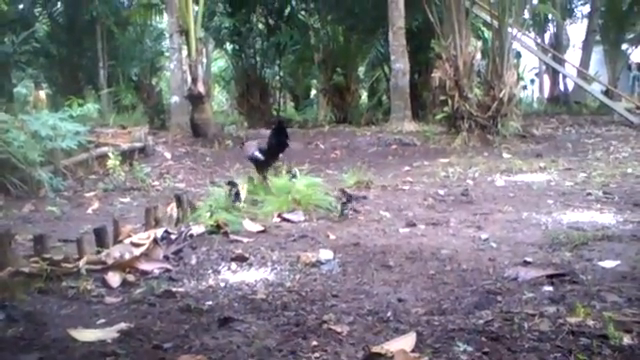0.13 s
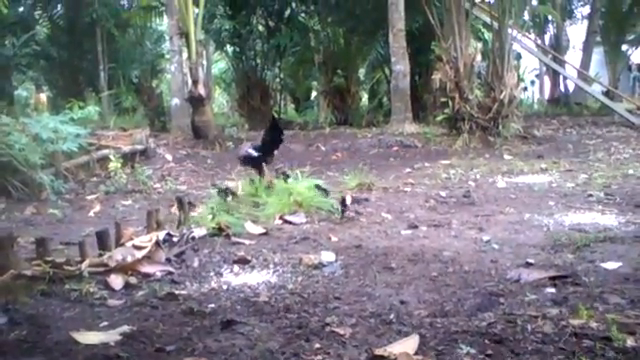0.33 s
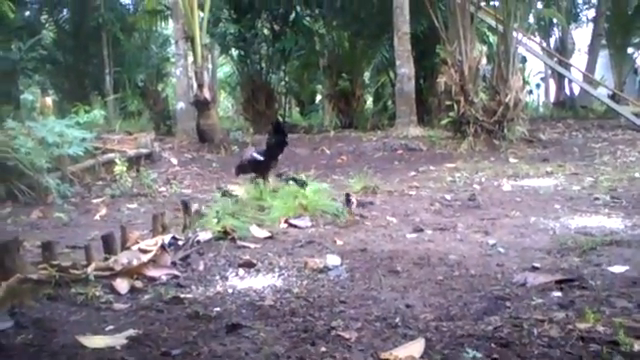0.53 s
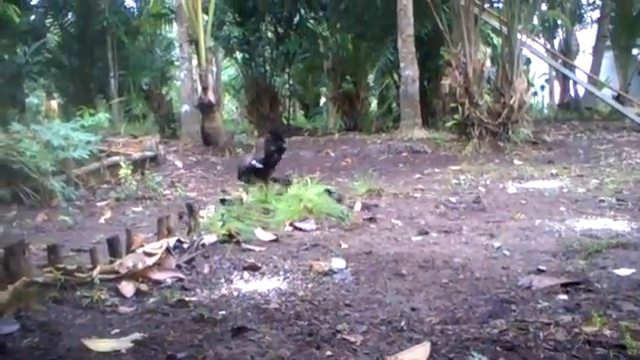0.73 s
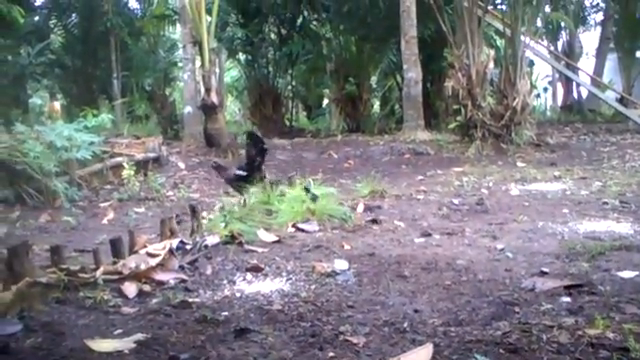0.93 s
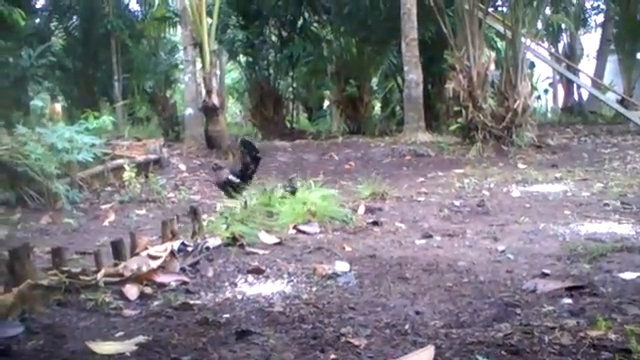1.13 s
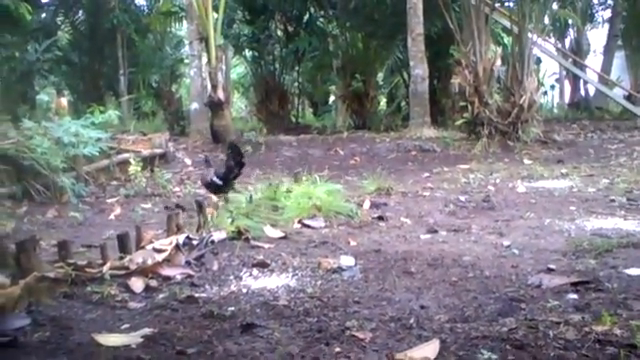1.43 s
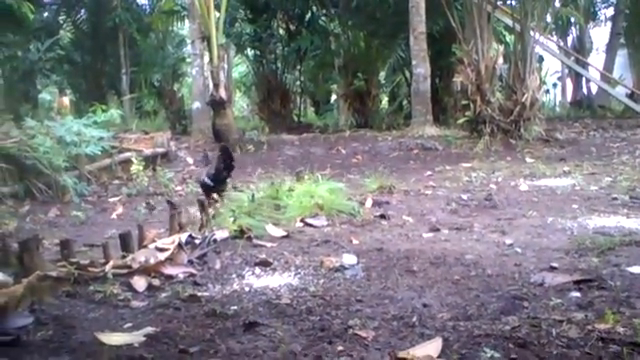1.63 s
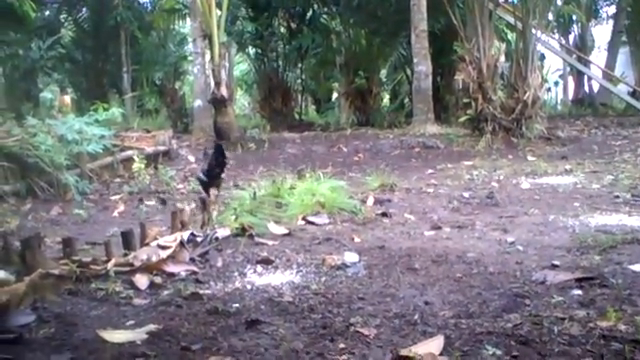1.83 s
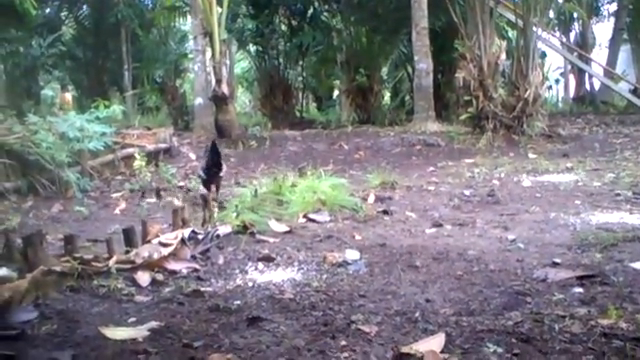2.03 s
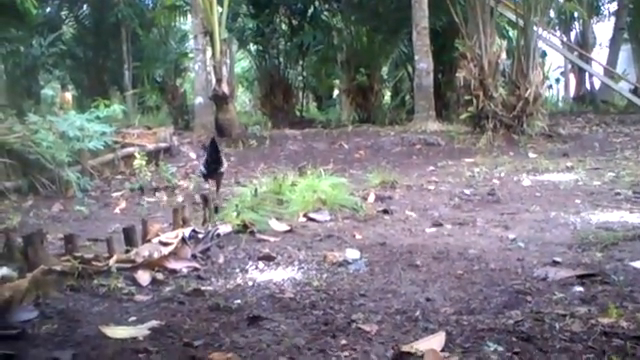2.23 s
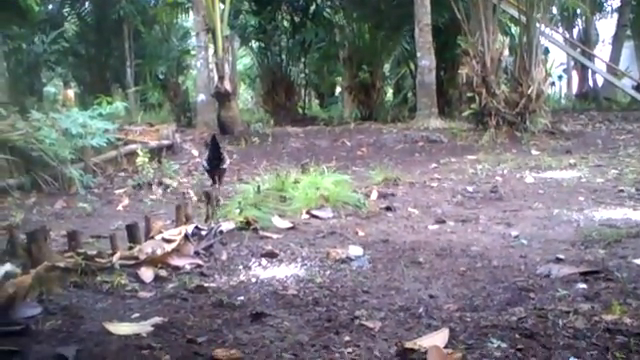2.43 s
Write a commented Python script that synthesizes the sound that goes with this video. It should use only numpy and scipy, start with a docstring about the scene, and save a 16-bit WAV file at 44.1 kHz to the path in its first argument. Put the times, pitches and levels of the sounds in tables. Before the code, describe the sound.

Chicks peep throughout with thin, quick falling whistles, some blurred by distance, and rapid trills around 0.1, 0.3, 0.6, 1.0, 1.4, 1.6, 1.85, 2.1 and 2.3 seconds. A hen gives soft hoarse clucks about four times a second. High insects throb and hiss steadily. A far engine thuds low, slowing slightly from fourteen to twelve beats a second. Dry litter swishes briefly at 2.27, then peeps cluster at 2.5.

```python
"""Chicks, hen and engine in a yard.

Chicks peep and trill (gliding sines) around a softly clucking hen (pulses and rasp through resonances);
trees scatter every call (decaying-noise convolution). Litter scuffs once (a noise burst).
Insects throb in the bushes (narrow noise bands) under a far chorus and outdoor air (shaped noise).
Far off a slow one-cylinder engine thuds twelve to fourteen times a second
(rounded low tone bursts, each with an echo, and puffs)."""
import sys
import numpy as np
from scipy import signal
from scipy.fft import rfft, irfft
from scipy.io import wavfile

SR = 44100
rng = np.random.default_rng(int(sys.argv[2]) if len(sys.argv) > 2 else 0)


def to_wav(sig):
    """Store sig (one row per channel, or 1-D mono) as 16-bit WAV at the path in sys.argv[1].

    Samples outside -1..1 are clipped; the rate is SR.
    """
    pcm = np.clip(np.atleast_2d(sig), -1, 1) * 32767
    pcm = np.round(pcm).astype(np.int16)
    wavfile.write(sys.argv[1], SR, pcm.T)  # frames by channels


N = 114660
T = np.arange(N) / SR  # s

# insect bands: pitch_hz, width_hz, level_db
THROBBER_BAND = (8764, 540, -60)
# insect band, level before the swell: pitch_hz, width_hz, level_db
DRONER_BAND = (7170, 130, -78)
# slow level curve of the droner: time_s, gain_db
DRONER_SWELL = [(0, -21), (.55, -1), (.98, 8), (1.15, 5), (1.35, -3), (1.8, -1), (2.3, 6), (2.6, 7)]
# far insect chorus spectrum: freq_hz, relative_density_db
CHORUS_SPECTRUM = [(2000, -66), (2800, -4.5), (3400, 5.5), (4200, 4), (4800, 8.5), (5300, -6), (6200, -19)]
# outdoor air spectrum: freq_hz, relative_density_db
AIR_SPECTRUM = [(20, -9), (50, 2), (130, 1), (220, -14), (330, -15), (600, -17.5), (1200, -25.5),
                (2400, -25.5), (4000, -30), (6200, -35), (10000, -37), (17000, -36.5)]
# time between engine firings: time_s, period_s
FIRING_PERIODS = [(0, .072), (.24, .075), (.4, .0795), (1.2, .081), (1.6, .085)]
# engine load: time_s, relative_level_db
ENGINE_LOAD = [(0, 0), (.09, -5), (.16, -3.5), (.24, -0.5), (.39, -3), (.47, -6), (.55, -8), (.63, -0.5),
               (.79, 1.5), (.87, -2), (.95, -1), (1.27, 0), (1.35, -6.5), (1.43, 0.5), (1.52, -4.5),
               (1.6, -1), (2.6, -1.5)]
# exhaust gas spectrum: freq_hz, relative_density_db
PUFF_SPECTRUM = [(120, 8), (170, 6), (300, 3.5), (500, -1), (750, -10.5), (1200, -35)]
# hen's clucks: middle_s, length_s, throat_hz, level_db
HEN_CLUCKS = [(.012, 0.073, 667, -41), (0.222, 0.079, 640, -42), (0.462, .06, 850, -44),
              (0.734, 0.057, 640, -42), (0.941, 0.067, 630, -42), (1.17, 0.15, 600, -47.5),
              (1.41, 0.08, 723, -46), (1.637, 0.067, 650, -47.5), (1.874, 0.065, 616, -42),
              (2.099, 0.12, 665, -44.5), (2.409, 0.07, 600, -41.5)]
# distant peeps, heard only as scatter: start_s, length_s, first_hz, last_hz, relative_level_db
DISTANT_PEEPS = [(-0.02, 0.041, 4774, 3490, -38), (0.095, 0.053, 4350, 3480, -43),
                 (0.198, 0.05, 4200, 3560, -52), (0.239, 0.051, 4780, 3190, -46),
                 (0.323, 0.024, 4000, 3380, -49), (0.41, 0.075, 4470, 3425, -47.5),
                 (0.473, 0.053, 5410, 4250, -42.5), (0.55, 0.15, 5770, 4810, -54),
                 (0.589, 0.051, 3950, 3180, -42), (0.655, 0.055, 5760, 4900, -47.5),
                 (0.8, 0.066, 4877, 3265, -44), (0.955, 0.062, 4900, 4180, -44),
                 (1.020, .045, 3400, 2800, -55), (1.160, 0.074, 4310, 3060, -51),
                 (1.254, 0.052, 4900, 3655, -49), (1.559, 0.0413, 3780, 3070, -43.5),
                 (1.652, 0.057, 4650, 3020, -50), (1.890, .05, 4470, 3365, -40),
                 (2.008, 0.058, 4490, 3400, -41.5), (2.150, 0.035, 4530, 4150, -38),
                 (2.179, 0.0325, 3850, 3310, -37), (2.299, .05, 4180, 3020, -38.5),
                 (2.385, 0.055, 5050, 4510, -48), (2.465, 0.088, 4370, 3290, -42)]
# near peeps: start_s, length_s, first_hz, last_hz, relative_level_db
NEAR_PEEPS = [(0.012, 0.061, 4200, 3380, -41), (0.232, 0.038, 5150, 5030, -56),
              (0.250, 0.038, 4300, 3280, -38.5), (0.442, 0.047, 5400, 5230, -50),
              (0.478, 0.028, 4400, 3550, -39), (0.488, 0.066, 5500, 4710, -53),
              (0.535, 0.053, 5400, 4770, -48), (0.540, 0.044, 3400, 2830, -53.5),
              (0.668, 0.033, 4700, 5410, -39), (0.696, 0.035, 4500, 4390, -37),
              (0.815, 0.028, 4400, 3675, -68), (0.845, 0.025, 3850, 3507, -43.5),
              (0.868, 0.038, 4600, 4150, -47), (0.985, 0.027, 3900, 3360, -47),
              (1.149, 0.025, 4053, 3493, -39), (1.205, 0.029, 3850, 3570, -48),
              (1.285, 0.03, 4300, 3610, -50), (1.412, 0.035, 2450, 2910, -55.5),
              (1.480, .048, 3600, 3140, -46), (1.552, 0.04, 4300, 3525, -43.5),
              (1.662, 0.045, 3900, 2350, -41.5), (1.720, 0.039, 3700, 3400, -51),
              (1.765, 0.048, 3680, 3340, -48), (1.906, 0.0223, 4260, 3530, -43.5),
              (1.940, 0.023, 3700, 3200, -43), (1.992, 0.028, 3800, 3370, -39),
              (2.015, 0.019, 3280, 2540, -38), (2.060, 0.038, 3700, 3430, -44),
              (2.098, 0.033, 4100, 3300, -41.5), (2.207, 0.02, 3464, 2540, -32),
              (2.465, .04, 4400, 3390, -44.5), (2.525, 0.033, 4000, 3500, -41),
              (2.547, .026, 4600, 3910, -37), (2.568, 0.018, 4000, 3320, -31.5)]
# short notes of the trills: start_s, middle_hz, relative_level_db
TRILLS = [(.074, 4490, -36.5), (.104, 4480, -35.5), (.128, 4160, -41), (.276, 4600, -40), (.314, 4536, -37),
          (.346, 4550, -37.5), (.587, 4430, -34.5), (.607, 4534, -31), (.634, 4410, -38),
          (1.005, 4650, -44), (1.325, 4410, -39.5), (1.361, 4680, -35), (1.394, 4706, -34),
          (1.429, 4700, -33), (1.568, 4700, -36.5), (1.605, 4690, -33.5), (1.641, 4680, -33),
          (1.805, 4660, -35.5), (1.844, 4706, -33), (1.880, 4710, -33.5), (2.043, 4630, -37.5),
          (2.078, 4720, -33.5), (2.113, 4770, -33), (2.283, 4750, -36), (2.317, 4800, -35),
          (2.352, 4710, -32)]
# dry litter spectrum: freq_hz, relative_density_db
SCUFF_SPECTRUM = [(800, -13), (1100, -12), (1500, -9), (1850, -6.5), (2100, -9), (2550, -6), (3100, -9),
                  (4500, -5.5), (5400, -22), (10000, -40), (16000, -46)]

THROB_PERIOD_S, THROB_PEAK_S, THROB_DEPTH = .1442, .102, .8
CHORUS_DB, AIR_DB = -52, -45.5
FIRST_FIRING_S, THUD_DB, THUD_SPREAD_DB = .0175, -25.5, 1.65
EXHAUST_HZ, EXHAUST_WIDTH_HZ = 89.3, 46
KNOCK_HZ, KNOCK_SHARE = 148, .24  # the exhaust's upper resonance
ECHO_S, ECHO_WANDER_S = .0172, .0013
PUFF_DB, PUFF_S, PUFF_LEAD_S = -41, .068, .022
CLUCK_HZ, CLUCK_JITTER_SHARE, CLUCK_RASP = 201.7, .1207, .47
THROAT_WIDTH_HZ = 212
CHEST_HZ, CHEST_WIDTH_HZ, CHEST_DB = 295, 140, -1
HEN_SCATTER_DB = -18
CHIRP_ATTACK_SHARE = .22
CHIRP_EDGE = .8  # lower values hold the level to the ends
QUAVER_SHARE, QUAVER_POINTS_PER_S, FLUTTER_DB = .02, 330, 3.5
OVERTONE_DB = -36
NOTE_S, NOTE_FALL_SHARE = .028, .17
PEEP_DB, PEEP_SCATTER_DB = .5, -1.6
TRILL_DB, TRILL_SCATTER_DB = -5.5, 2
NEAR_T60_S, FAR_T60_S, FAR_DB, SCATTER_BUILD_S = .13, .5, -15, .002
SCUFF_AT_S, SCUFF_RISE_S, SCUFF_FALL_S, SCUFF_DB = 2.272, .022, .045, -37.5
CUTOFF_HZ = 17250


def from_db(db):
    """Decibels to gain."""
    return 10 ** (np.asarray(db) / 20)


def rms_one(x):
    """Scale to unit rms."""
    return x / np.sqrt(np.mean(x ** 2) + 1e-20)


def along(points, at):
    """Read a curve by straight lines."""
    return np.interp(at, *np.transpose(points))


def add(out, start_s, sound):
    """Mix a sound in at a time, trimmed to the scene."""
    i = int(start_s * SR)
    a, b = max(i, 0), min(i + len(sound), N)
    if b > a:
        out[a:b] += sound[a - i:b - i]


def noise(spectrum):
    """Noise at rms 1, its spectrum read in dB over log frequency."""
    hz, db = np.transpose(spectrum)
    f = np.maximum(np.arange(N // 2 + 1) * SR / N, 1)
    gain = from_db(np.interp(np.log(f), np.log(hz), db))
    white = rng.standard_normal(N)
    return rms_one(irfft(rfft(white) * gain, N))


def resonate(x, hz, width_hz):
    """A two-pole resonance applied twice, for steep skirts."""
    r = np.exp(-np.pi * width_hz / SR)
    g = (1 - r * r) / 2
    section = [g, 0, -g, 1, -2 * r * np.cos(2 * np.pi * hz / SR), r * r]
    return signal.sosfilt([section] * 2, x + 1e-18)


def swell(u, attack):
    """Smooth rise and fall over u = 0..1, topping at the attack share."""
    ramp = np.interp(u, [0, np.clip(attack, .05, .95), 1], [0, 1, 0])
    return np.sin(np.pi / 2 * ramp)


def trees(x):
    """Dense scatter from near trunks and leaves, plus a longer faint tail from the grove."""
    t = T[:SR]
    near = from_db(-60 * t / NEAR_T60_S)
    far = from_db(FAR_DB - 60 * t / FAR_T60_S)
    decay = (near + far) * (1 - np.exp(-t / SCATTER_BUILD_S))
    response = decay * rng.standard_normal(len(t))
    response /= np.sqrt(np.sum(response ** 2))  # unit energy
    return signal.fftconvolve(x, response)[:N]


def insect_band(hz, width_hz, db):
    """White noise narrowed to a shrill band by a resonance."""
    return from_db(db) * rms_one(resonate(rng.standard_normal(N), hz, width_hz))


def insects():
    """One narrow band throbs seven times a second, another slowly swells; a broader chorus holds steady."""
    throb = 1 - THROB_DEPTH * np.abs(np.sin(np.pi * (T - THROB_PEAK_S) / THROB_PERIOD_S)) ** 3
    throbber = throb * insect_band(*THROBBER_BAND)
    droner = from_db(along(DRONER_SWELL, T)) * insect_band(*DRONER_BAND)
    return throbber + droner + from_db(CHORUS_DB) * noise(CHORUS_SPECTRUM)


def air():
    """Outdoor air: steady noise, strongest in the lows."""
    return from_db(AIR_DB) * noise(AIR_SPECTRUM)


def engine():
    """Each firing is a rounded exhaust thud that echoes once and carries a puff of gas."""
    thuds, puffs = np.zeros((2, N))
    t = T[:SR // 10] - .05  # thud is centred on its firing
    tone = np.sin(2 * np.pi * EXHAUST_HZ * t) + KNOCK_SHARE * np.cos(2 * np.pi * KNOCK_HZ * t)
    thud = tone * np.exp(-(np.pi * EXHAUST_WIDTH_HZ * t) ** 2)
    puff = swell(T[:SR // 4] / PUFF_S, attack=.62)
    s = FIRST_FIRING_S
    for strength, wander in rng.standard_normal(size=(36, 2)):
        gain = from_db(along(ENGINE_LOAD, s) + THUD_SPREAD_DB * strength)
        add(thuds, s + t[0], gain * thud)
        add(thuds, s + t[0] + ECHO_S + ECHO_WANDER_S * wander, gain * thud)
        add(puffs, s - PUFF_LEAD_S, gain * puff)
        s += along(FIRING_PERIODS, s)
    return from_db(THUD_DB) * thuds + from_db(PUFF_DB) * puffs * noise(PUFF_SPECTRUM)


def hen():
    """Soft hoarse clucks: uneven pulses and rasp ring in the throat and chest."""
    out = np.zeros(N)
    t = T[:SR // 4]
    for middle_s, length_s, throat_hz, db in HEN_CLUCKS:
        jitter = np.repeat(rng.standard_normal(size=128), SR // 256)[:len(t)]
        cycles = np.cumsum(CLUCK_HZ * (1 + CLUCK_JITTER_SHARE * jitter)) / SR
        pulses = rms_one(np.diff(np.floor(cycles), prepend=0))
        source = pulses + CLUCK_RASP * rng.standard_normal(len(t))
        throat = rms_one(resonate(source, throat_hz, THROAT_WIDTH_HZ))
        chest = rms_one(resonate(source, CHEST_HZ, CHEST_WIDTH_HZ))
        voice = rms_one(throat + from_db(CHEST_DB) * chest)
        envelope = swell(t / length_s, attack=.55) ** 1.6
        add(out, middle_s - length_s / 2, from_db(db) * voice * envelope)
    return out + from_db(HEN_SCATTER_DB) * trees(out)


def chirp(length_s, first_hz, last_hz):
    """A thin whistle gliding in pitch, with random quaver and level flutter; rms .5."""
    t = np.arange(int(length_s * SR)) / SR
    u = t / length_s
    points = rng.standard_normal(size=(2, 64))
    quaver, flutter = [np.interp(t * QUAVER_POINTS_PER_S, np.arange(64), w) for w in points]
    hz = (first_hz + (last_hz - first_hz) * u) * (1 + QUAVER_SHARE * quaver)
    phase = 2 * np.pi * np.cumsum(hz) / SR
    level = swell(u, CHIRP_ATTACK_SHARE) ** CHIRP_EDGE * from_db(FLUTTER_DB * flutter)
    tone = np.sin(phase) + from_db(OVERTONE_DB) * np.sin(2 * phase)
    return .5 * rms_one(level * tone)


def far_chicks():
    """Distant peeps blurred by the trees, with no direct sound."""
    out = np.zeros(N)
    for start_s, length_s, first_hz, last_hz, db in DISTANT_PEEPS:
        add(out, start_s, from_db(db) * chirp(length_s, first_hz, last_hz))
    return trees(out)


def chicks():
    """Single gliding peeps and quick runs of short falling notes, direct and scattered."""
    peeps, trills = np.zeros((2, N))
    for start_s, length_s, first_hz, last_hz, db in NEAR_PEEPS:
        add(peeps, start_s, from_db(db + PEEP_DB) * chirp(length_s, first_hz, last_hz))
    for start_s, hz, db in TRILLS:
        first_hz, last_hz = hz * (1 + NOTE_FALL_SHARE / 2), hz * (1 - NOTE_FALL_SHARE / 2)
        add(trills, start_s, from_db(db + TRILL_DB) * chirp(NOTE_S, first_hz, last_hz))
    scatter = from_db(PEEP_SCATTER_DB) * trees(peeps) + from_db(TRILL_SCATTER_DB) * trees(trills)
    return peeps + trills + scatter


def scuff():
    """A brief swish in dry litter: noise with exponential rise and fall."""
    since_s = T - SCUFF_AT_S
    envelope = np.exp(np.minimum(since_s / SCUFF_RISE_S, -since_s / SCUFF_FALL_S))
    return from_db(SCUFF_DB) * envelope * noise(SCUFF_SPECTRUM)


def scene():
    """The whole yard, summed to one channel."""
    yard = insects() + air() + engine() + hen() + far_chicks() + chicks() + scuff()
    return yard[None]


def record(dry):
    """Cut the top steeply with an elliptic low-pass."""
    lowpass = signal.ellip(12, .1, 80, CUTOFF_HZ, fs=SR, output="sos")
    return signal.sosfilt(lowpass, dry)


dry = scene()
out = record(dry)
to_wav(out)
```